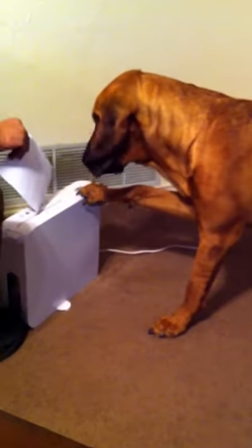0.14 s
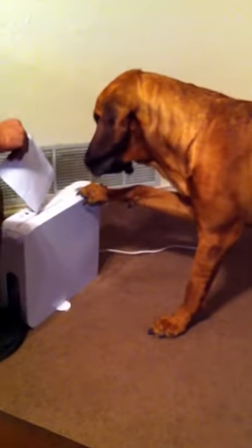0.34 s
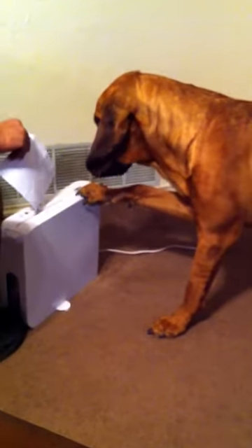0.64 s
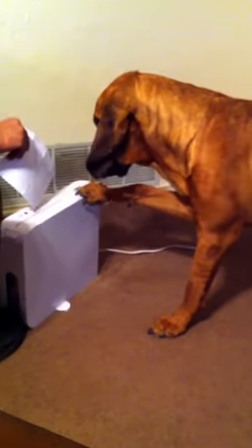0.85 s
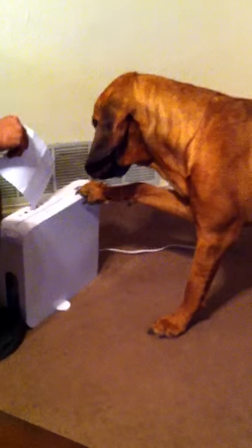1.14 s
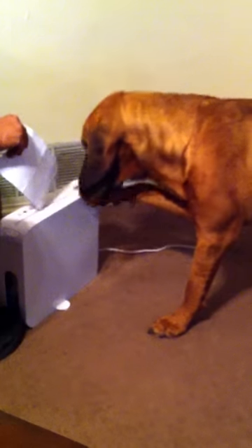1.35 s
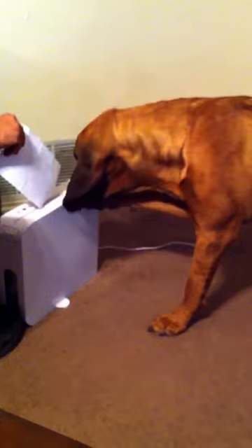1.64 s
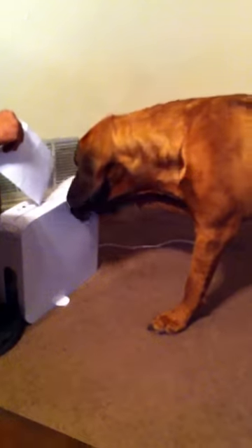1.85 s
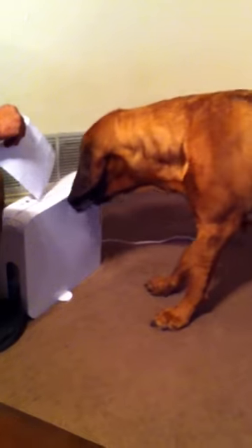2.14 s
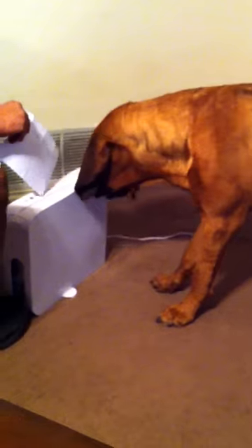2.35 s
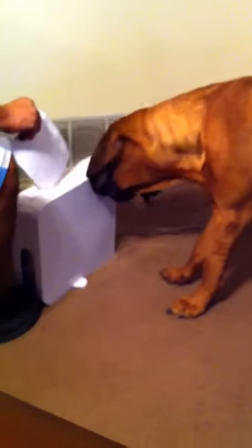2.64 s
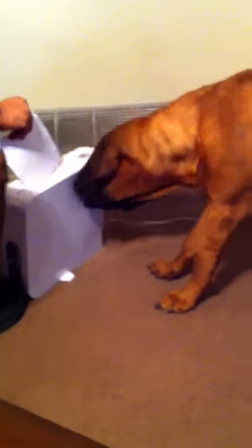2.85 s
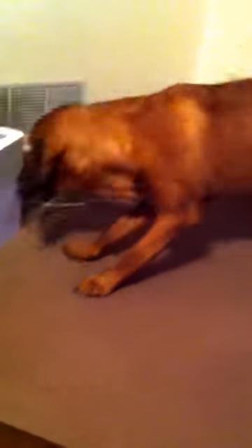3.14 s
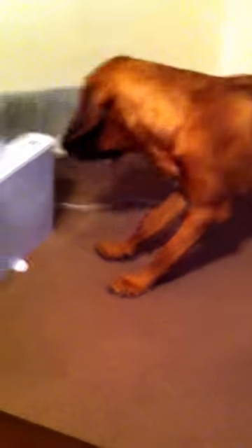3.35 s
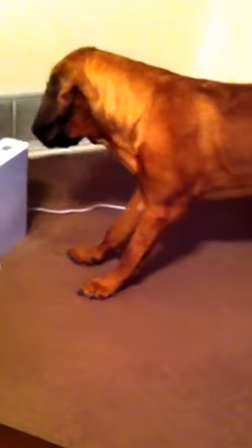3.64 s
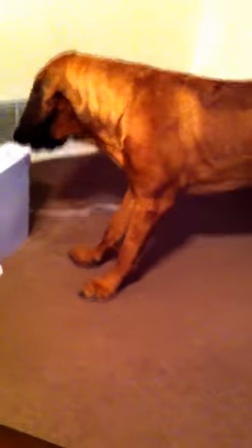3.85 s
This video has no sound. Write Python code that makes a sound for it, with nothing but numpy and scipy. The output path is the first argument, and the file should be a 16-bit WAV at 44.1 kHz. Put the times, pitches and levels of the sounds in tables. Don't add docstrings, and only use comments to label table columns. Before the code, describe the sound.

A paper shredder whirs up and tears paper loudly after quiet dog paw taps indoors.

```python
import sys
import numpy as np
from scipy import signal
from scipy.fft import rfft, irfft
from scipy.io import wavfile
from scipy.ndimage import uniform_filter1d

SR = 44100
rng = np.random.default_rng(int(sys.argv[2]) if len(sys.argv) > 2 else 0)


def dump_mix(stems):
    frames = np.atleast_2d(stems).T
    limited = np.clip(frames, -1, 1)
    pcm = np.round(limited * 32767).astype(np.int16)
    wavfile.write(sys.argv[1], SR, pcm)


def gain_from_db(level_db):
    decades = np.asarray(level_db, float) / 20
    return 10 ** decades


N = 176400

MOTOR_ON_S, ROTOR_TURNS_S = 3.04, 3.047

# (f/Hz, level/dB)
CUT_PAPER = [(700, -10.5), (1300, -12), (3000, -8.5), (4500, -5), (7000, -4.5), (10000, 0), (12500, -4.5),
             (15800, -5.5)]


def evened(x):
    return x / np.sqrt(np.mean(x ** 2) + 1e-20)


def read(points, hz):
    f, value = np.transpose(points)
    return np.interp(np.log(hz + 1), np.log(f + 1), value)


def add(mix, s, sound):
    part = mix[round(s * SR):][:len(sound)]
    part += sound[:len(part)]


def colour(x, points):
    gain = gain_from_db(read(points, np.fft.rfftfreq(len(x), 1 / SR)))
    return evened(irfft(rfft(x) * gain, len(x)))


def slow(per_s):
    span = max(int(SR / per_s), 2)
    drift = uniform_filter1d(rng.standard_normal(N), span)
    return evened(uniform_filter1d(drift, span))


def resonate(x, hz, width):
    turn = np.exp(2j * np.pi * np.cumsum(hz * np.ones(len(x))) / SR)
    pole = np.exp(-np.pi * width / SR)
    return 2 * (turn * signal.lfilter([1 - pole], [1, -pole], x / turn + 1e-18)).real


def grains(per_s, spread_db):
    size = gain_from_db(spread_db * np.minimum(rng.exponential(1, N), 4))
    struck = rng.random(N) < per_s / SR
    return evened(size * rng.standard_normal(N) * struck)


def knock(db, hz, t60, width, edge_db, edge_t60, tint, strike=4.3, rise_s=1e-5):
    t = np.arange(6000) / SR
    ring, edge = rng.standard_normal((2, 6000))
    ring = ring + strike * np.sqrt(SR / hz) * (t == 0)
    ring = resonate(ring, hz, 3 * width * hz)
    ring = evened(resonate(ring, hz, width * hz)) * gain_from_db(-60 * t / max(t60, .005))
    edge = colour(edge, tint) * gain_from_db(edge_db - 60 * t / edge_t60)
    blow = np.minimum(t / max(rise_s, .5 / hz), 1) * (ring + edge)
    return gain_from_db(db) * blow / abs(blow).max()


def air():
    # (f/Hz, level/dB)
    hiss_spectrum = [(25, -5), (65, -25), (100, -19.5), (160, -7.5), (250, -10), (450, -10.5), (1000, -18),
                     (2500, -23.5), (6500, -25.5), (10000, -24.5), (15800, -29)]
    # (f/Hz, width/Hz, level/dB)
    modes = [(242, 20, 0)]
    tones = sum(gain_from_db(db) * evened(resonate(rng.standard_normal(N), hz, w)) for hz, w, db in modes)
    hiss = colour(rng.standard_normal(N), hiss_spectrum)
    return gain_from_db(-61 + .5 * slow(22)) * hiss + gain_from_db(-69.5) * evened(tones)


def room(x):
    # (f/Hz, t60/s)
    absorption = [(200, 0.45), (1000, 0.54), (4000, 0.4), (12000, 0.3)]
    taps = np.zeros(SR // 2)
    at = np.arange(200, len(taps) - 20, 20)
    taps[at + rng.integers(0, 20, len(at))] = rng.choice([-1., 1.], len(at))
    hz, t, z = signal.stft(taps, SR, nperseg=256)
    decay = gain_from_db(-60 * t / read(absorption, hz)[:, None])
    tail = signal.istft(z * decay, SR, nperseg=256)[1]
    return signal.fftconvolve(x, tail / np.linalg.norm(tail))[:N]


def sheet():
    # (t/s, length/s, level/dB)
    rustles = [
        (0.215, 0.17, -57.5),
        (1.4, 0.12, -61),
        (1.532, 0.09, -65),
        (1.97, 0.13, -56.5),
        (2.517, 0.043, -64),
        (2.776, 0.22, -64),
    ]
    # (f/Hz, level/dB)
    paper_spectrum = [(500, -13), (900, -6), (2500, -4), (6000, -5.5), (9500, -0.5), (12500, -5),
                      (15800, -17)]
    t = np.arange(N) / SR
    fizz = colour(rng.standard_normal(N) + .5 * grains(2000, 3.4), paper_spectrum)
    swell = sum(gain_from_db(db) * np.sin(np.pi * np.clip((t - s) / length, 0, 1)) ** 2
                for s, length, db in rustles)
    return fizz * swell


def paws():
    # (t/s, level/dB, f/Hz, t60/s, edge level/dB)
    claws = [(0.093, -45, 2100, .05, -3), (0.097, -42.5, 1980, 0.063, -1.5), (.107, -52, 696, 0.076, 3),
             (.123, -47, 540, 0.072, 0), (0.1, -47, 766, 0.17, -4), (0.111, -45.5, 1450, 0.11, -8),
             (0.29, -57, 780, 0.08, -2), (0.309, -48, 1380, 0.06, -3), (1.44, -42.5, 650, 0.11, 3.5),
             (1.448, -44, 650, 0.094, -10), (1.46, -37.5, 2450, 0.053, -10), (1.47, -44, 2380, .06, -10),
             (1.49, -48, 1600, 0.14, 0), (1.439, -46.5, 2400, .08, -2), (1.474, -43, 815, 0.074, 2),
             (1.525, -47, 850, 0.092, -3), (1.666, -50, 1370, 0.071, -8), (1.959, -52, 501, 0.078, 1),
             (1.98, -41, 630, 0.12, 1), (1.983, -36.5, 2060, 0.045, 2), (1.993, -32, 1520, 0.053, 5),
             (2.003, -27, 2200, 0.027, -2), (2.004, -34.5, 1250, 0.052, -6), (2.01, -39, 666, 0.049, -6),
             (2.02, -40.5, 2240, 0.054, -2), (2.033, -40.5, 1280, 0.12, -15), (2.042, -42, 1200, 0.071, 12),
             (2.195, -42, 503, 0.08, -11), (2.197, -44.5, 840, 0.095, -12), (2.242, -42.5, 560, 0.064, -6),
             (2.529, -50, 1040, 0.11, 9), (2.55, -49, 1050, 0.093, 7)]
    # (t/s, level/dB, f/Hz)
    nails = [
        (1.461, -42.5, 9500),
        (1.994, -30.5, 10600),
        (2.002, -25, 10400),
        (2.043, -42, 9000),
    ]
    # (t/s, level/dB, f/Hz, t60/s)
    thumps = [(0.1, -46.5, 432, 0.1), (1.016, -68, 242, 0.077), (1.469, -43, 273, 0.064),
              (1.541, -45, 242, 0.04), (1.608, -44, 240, 0.043), (1.8, -53, 253, 0.085),
              (1.995, -40, 220, .08), (2.006, -36.5, 192, 0.11), (2.031, -40.5, 198, 0.14),
              (2.046, -35.5, 186, .2), (2.066, -48, 199, 0.14), (2.196, -42, 520, 0.14),
              (2.2, -35, 230, 0.088), (2.212, -42, 165, 0.062), (2.231, -38, 241, 0.095),
              (2.244, -57, 185, 0.056), (2.253, -40.5, 197, 0.14), (2.29, -52, 200, 0.077),
              (2.658, -41.5, 350, 0.055), (3.049, -36, 413, 0.074), (3.074, -38.5, 150, 0.12)]
    # (f/Hz, level/dB)
    plastic_edge = [(50, -33), (180, -11), (1000, 6), (3000, -1.5), (6000, -8.5), (10500, -13),
                    (15800, -26)]
    edge_t60_s = 0.11
    out = np.zeros(N)
    for s, db, hz, t60, edge_db in claws:
        add(out, s, knock(db - 1.5, hz, t60, .28, edge_db, edge_t60_s, plastic_edge,
                          strike=3, rise_s=.001))
    for s, db, hz in nails:
        add(out, s, knock(db, hz, .025, .4, -3, .03, CUT_PAPER))
    for s, db, hz, t60 in thumps:
        add(out, s, knock(db - 2.5, hz, t60, .24, -11.5, edge_t60_s, plastic_edge))
    return out


def motor(column):
    # (t/s, shaft f/Hz, housing level/dB, cutter level/dB)
    course = np.transpose([(3.039, 60, -46, -55), (3.1, 120.4, -49.5, -50.5), (3.156, 139.3, -49, -49),
                           (3.161, 146, -42, -43.5), (3.22, 160, -42.5, -41), (3.3, 177.6, -43.5, -41),
                           (3.398, 190.5, -42.5, -37.5), (3.5, 190.4, -41, -32.5),
                           (3.65, 194.2, -40, -35.5), (3.75, 187.8, -42, -33), (3.901, 183.4, -42.5, -29.5),
                           (4, 181.6, -39, -30)])
    return np.interp(np.arange(N) / SR, course[0], course[column])


def mains_buzz():
    # (multiple of 120 Hz, level/dB)
    partials = [(1, 0), (1.5, -9), (2, -6), (3, -9), (4, -13)]
    t = np.arange(N) / SR
    buzz = sum(gain_from_db(db) * np.sin(2 * np.pi * (k * 120 * t + rng.random())) for k, db in partials)
    fade_db = -55 * np.maximum(t - MOTOR_ON_S, 0)
    return buzz * gain_from_db(-44 + fade_db + 2.1 * slow(40))


def shaft_tones():
    # (multiple of shaft f, level/dB, fade t/s)
    orders = [(1, -6.5, 3.56), (1.5, -12, 3.72), (1.7, -10, 3.8), (3, -3, 3.76), (5, -11, 3.7),
              (5.9, -13, 3.95)]
    spun_up_s, order_width_hz, sag_db = 3.31, 32, -15
    t = np.arange(N) / SR
    shaft_hz = motor(column=1)
    out = np.zeros(N)
    for k, db, fade_s in orders:
        level_db = db + sag_db * np.clip((t - fade_s) / .04, 0, 1) + 1.6 * slow(35)
        jitter = evened(resonate(rng.standard_normal(N), k * shaft_hz, order_width_hz))
        tone = np.sin(2 * np.pi * (k * np.cumsum(shaft_hz) / SR + rng.random()))
        out += gain_from_db(level_db) * (.25 * jitter + tone)
    return out * gain_from_db(motor(column=2) - 10 * np.clip((spun_up_s - t) * 10, 0, 1))


def hum():
    onset = np.clip((np.arange(N) / SR - ROTOR_TURNS_S) / 0.018, 0, 1)
    return onset * (mains_buzz() + shaft_tones())


def housing():
    # (f/Hz, level/dB)
    shell_spectrum = [(35, -47), (60, -28), (152, 2.5), (437, -3.5), (559, -0.5), (690, -4), (1110, -4),
                      (2160, -11.5), (4000, -16), (5200, -20), (8800, -120)]
    rumble = colour(rng.standard_normal(N), shell_spectrum)
    start = np.clip((np.arange(N) / SR - ROTOR_TURNS_S) * 200, .2, 1)
    return start * rumble * gain_from_db(motor(column=2) - 1 + 1.75 * slow(73))


def tearing():
    patches = [1800, 3200, 4800, 6500, 8500, 10500, 12500]
    crackle_share, patch_rate_per_s = .25, 70
    tear = np.sqrt(1 - crackle_share) * rng.standard_normal(N)
    tear = tear + np.sqrt(crackle_share) * grains(3000, spread_db=1.5)
    strips = sum(resonate(tear, hz, 1700) * gain_from_db(3.4 * slow(patch_rate_per_s)) for hz in patches)
    tear = colour(tear + gain_from_db(2) * strips, CUT_PAPER)
    return tear * gain_from_db(motor(column=3) + .8 * slow(43))


def snaps():
    # (t/s, level/dB, f/Hz)
    breaks = [(3.1611, -29.1, 2300), (3.1876, -24.1, 9800), (3.2172, -29.4, 11700), (3.2268, -29.1, 9700),
              (3.2399, -28.0, 10000), (3.2435, -26.0, 10200), (3.2531, -27.0, 11700), (3.2648, -25.9, 8800),
              (3.3023, -30.4, 9700), (3.3972, -21.3, 9400), (3.4138, -26.3, 11300), (3.4209, -18.9, 12100),
              (3.425, -17.5, 11300), (3.4286, -17.9, 12300), (3.4505, -13.6, 4300), (3.4571, -8.1, 10800),
              (3.461, -18.3, 12700), (3.465, -17.2, 11600), (3.4778, -20.7, 9400), (3.492, -21.7, 9800),
              (3.5067, -17.0, 10500), (3.5111, -20.3, 12300), (3.5238, -21.2, 11700),
              (3.5414, -17.4, 10700), (3.5592, -21.5, 6000), (3.5627, -21.3, 10900), (3.5845, -14.3, 6400),
              (3.5888, -18.3, 7100), (3.5924, -16.7, 8100), (3.605, -19.5, 10200), (3.6495, -22.5, 9000),
              (3.6658, -16.7, 8300), (3.6698, -23.3, 9700), (3.7116, -14.7, 9600), (3.7189, -19.1, 10600),
              (3.7243, -15.7, 9400), (3.735, -18.2, 7600), (3.7683, -19.6, 8800), (3.7728, -21.9, 8500),
              (3.7778, -19.6, 7800), (3.7935, -10.2, 9600), (3.804, -17.9, 12400), (3.8125, -20.1, 9000),
              (3.8322, -17.6, 8400), (3.8411, -14.1, 8700), (3.8484, -14.3, 11900), (3.8676, -19.2, 10200),
              (3.8749, -19.0, 10600), (3.8841, -19.3, 12600), (3.9001, -17.8, 10200), (3.9084, -16.7, 9700),
              (3.92, -17.2, 9300), (3.9503, -13.0, 11500), (3.9541, -13.8, 9100), (3.9576, -17.0, 8400),
              (3.9791, -16.7, 9200), (3.9863, -17.2, 9800), (3.9905, -16.2, 9600), (3.9941, -11.0, 10100),
              (3.9982, -17.0, 8300)]
    # (t/s, level/dB, f/Hz)
    folds = [(3.0398, -34.5, 9000), (3.0418, -31, 8150), (3.0505, -41, 9000), (3.1592, -29, 4500),
             (3.4291, -18.5, 4600), (3.4325, -25, 4500), (3.4665, -23, 3300), (3.541, -21, 6000),
             (3.5844, -15.5, 10800), (3.5934, -18, 3010), (3.6128, -21, 4030), (3.7117, -25, 5100),
             (3.7242, -22, 4800), (3.792, -30, 3000), (3.849, -35, 5000), (3.919, -37, 3034),
             (3.992, -16, 4500)]
    snap_t60_s, fold_t60_s, width, edge_db, strike = .015, .046, .42, -3, 3.8
    out = np.zeros(N)
    for s, db, hz in breaks:
        add(out, s, knock(db - .5, hz, snap_t60_s, width, edge_db, snap_t60_s, CUT_PAPER, strike))
    for s, db, hz in folds:
        add(out, s, knock(db, hz, fold_t60_s, width, edge_db, snap_t60_s, CUT_PAPER, strike))
    return out


def gear_whines():
    # (t/s, from f/Hz, to f/Hz)
    glides = [
        (3.07, 8800, 9600),
        (3.125, 4600, 4750),
    ]
    u = np.linspace(0, 1, 2000)
    out = np.zeros(N)
    for s, from_hz, to_hz in glides:
        phase = 2 * np.pi * np.cumsum(from_hz + (to_hz - from_hz) * u) / SR
        add(out, s, gain_from_db(-59) * np.sin(np.pi * u) * np.sin(phase))
    return out


def shredder():
    on = np.clip((np.arange(N) / SR - MOTOR_ON_S) / 0.0053, 0, 1)
    return on * (housing() + tearing()) + snaps() + gear_whines()


def scene():
    near = paws() + sheet() + shredder()
    return np.tile(near + gain_from_db(-7.5) * room(near) + hum() + air(), (2, 1))


def roll_off(x):
    return signal.sosfilt(signal.butter(12, 16170, fs=SR, output="sos"), x)


def record(dry):
    # (t/s, length/s, level/dB)
    dips = [
        (1.985, .006, -9),
        (3.0315, .0055, -22),
    ]
    bass_cut = signal.butter(2, 101, "high", fs=SR, output="sos")
    treble_pass = signal.butter(2, 800, "high", fs=SR, output="sos")
    heard = signal.sosfilt(bass_cut, dry)
    treble = signal.sosfiltfilt(treble_pass, heard)
    t = np.arange(N) / SR
    dip_db = sum(db * np.clip(np.minimum(t - s, s + length - t) * 600, 0, 1)
                 for s, length, db in dips)
    heard = heard + treble * (gain_from_db(dip_db) - 1)
    treble_limit = signal.firwin(511, 15800, window=("kaiser", 9), fs=SR)
    heard = signal.oaconvolve(heard, treble_limit[None], "same")
    return roll_off(heard)


dry = scene()
out = record(dry)
dump_mix(out)
```